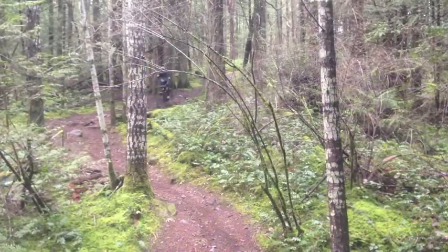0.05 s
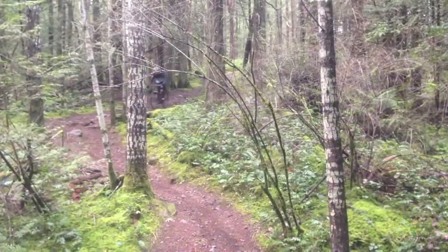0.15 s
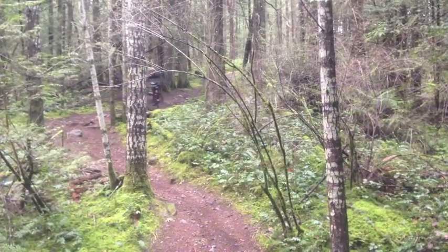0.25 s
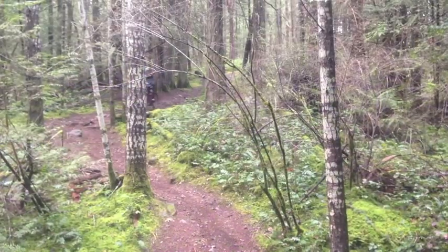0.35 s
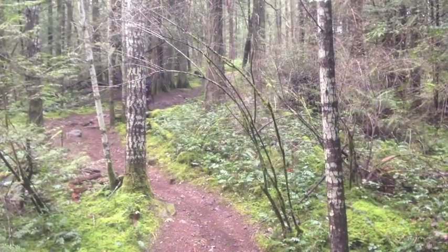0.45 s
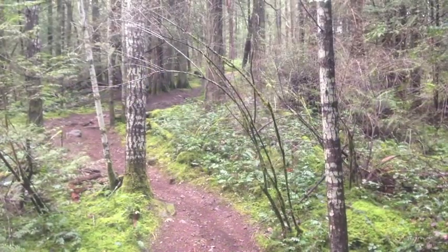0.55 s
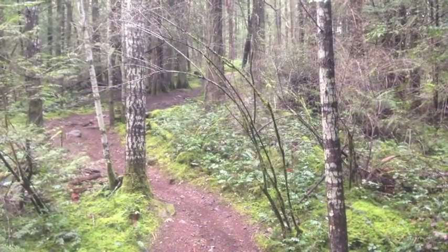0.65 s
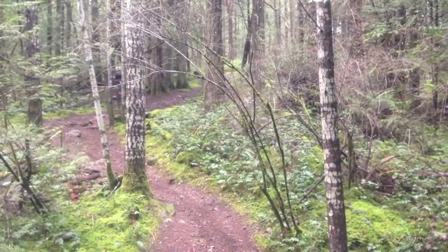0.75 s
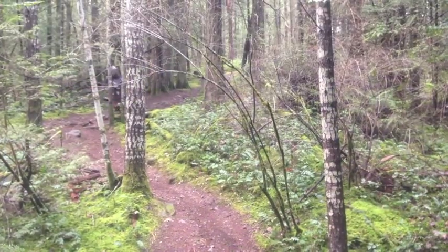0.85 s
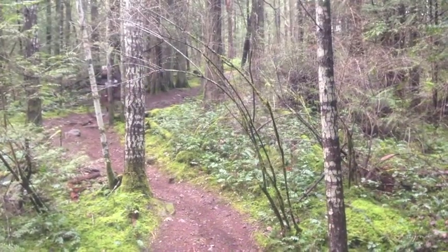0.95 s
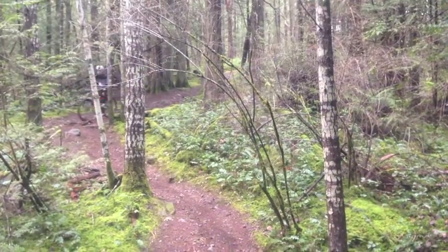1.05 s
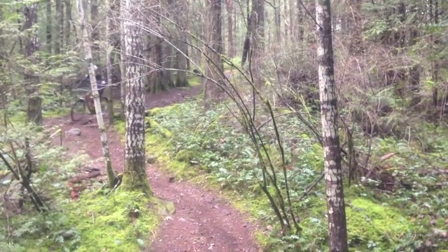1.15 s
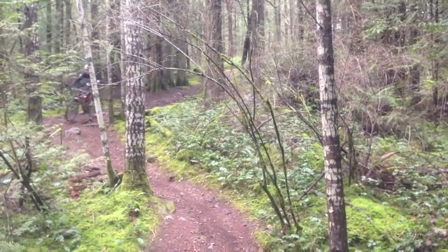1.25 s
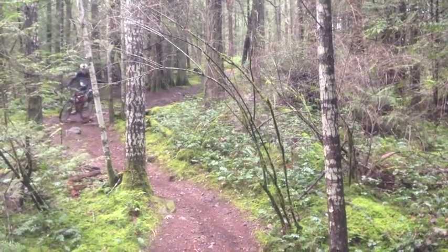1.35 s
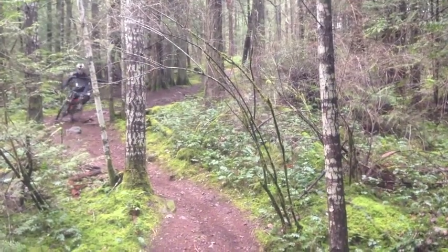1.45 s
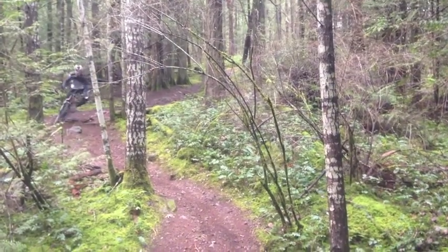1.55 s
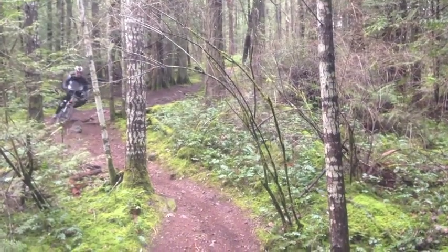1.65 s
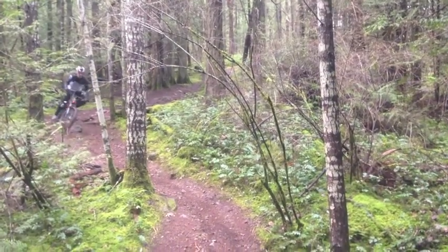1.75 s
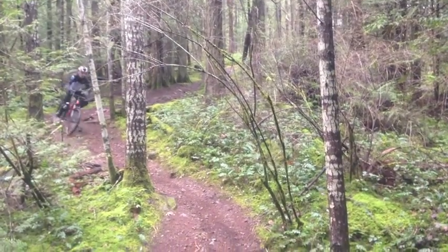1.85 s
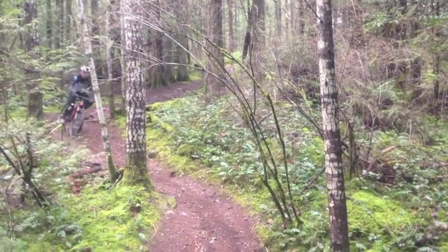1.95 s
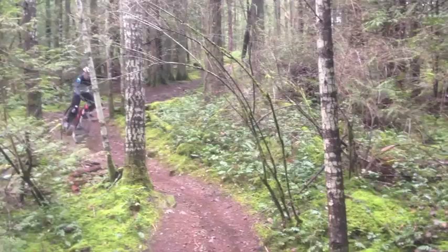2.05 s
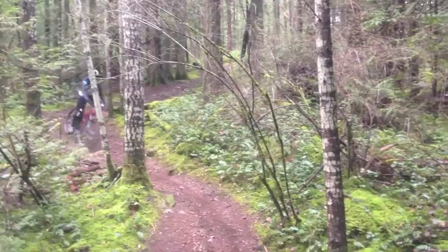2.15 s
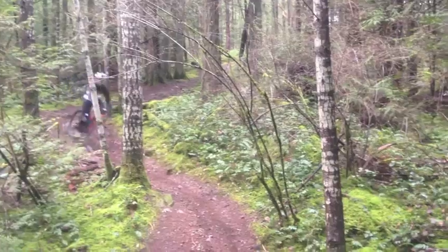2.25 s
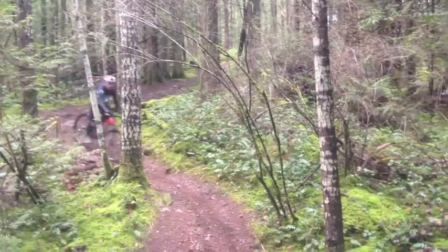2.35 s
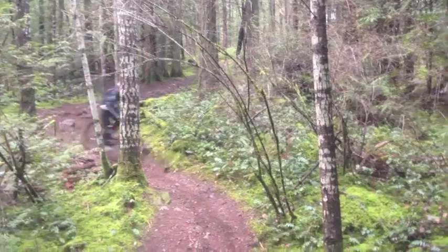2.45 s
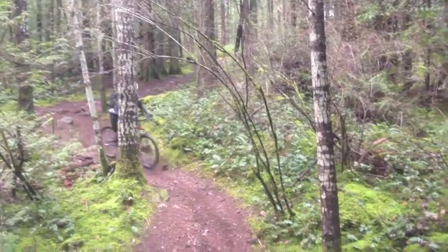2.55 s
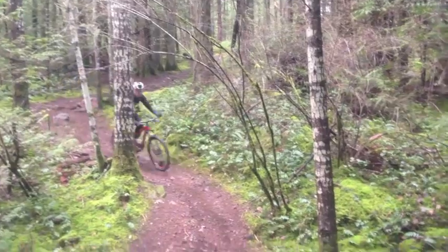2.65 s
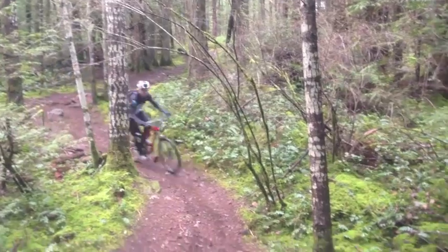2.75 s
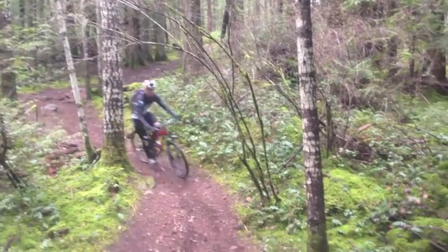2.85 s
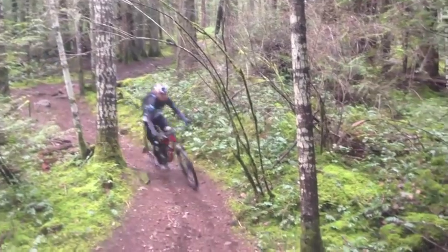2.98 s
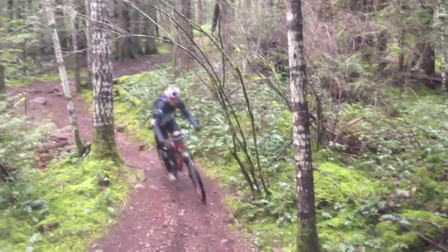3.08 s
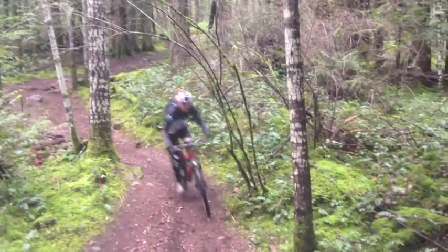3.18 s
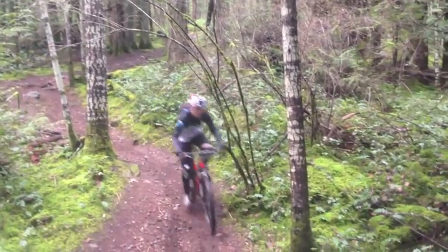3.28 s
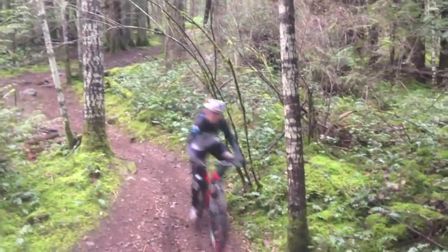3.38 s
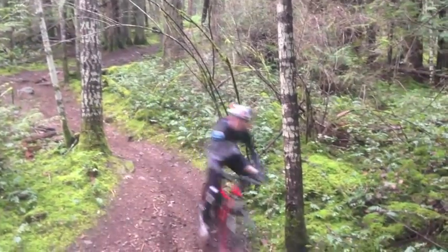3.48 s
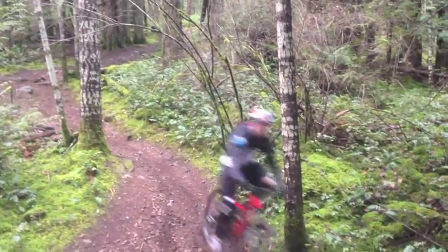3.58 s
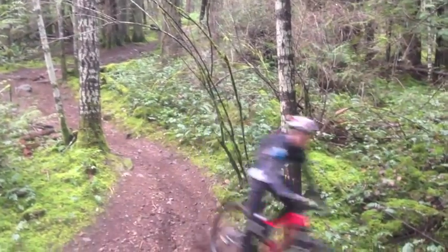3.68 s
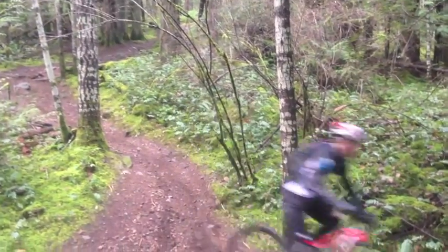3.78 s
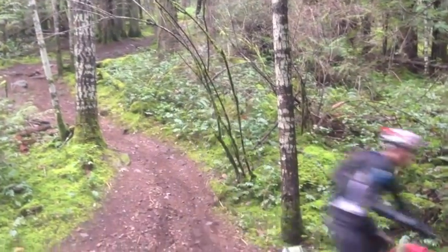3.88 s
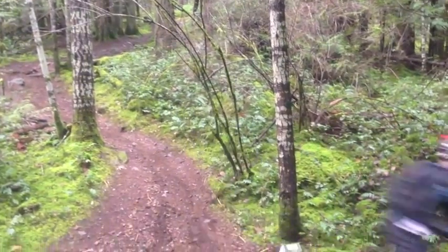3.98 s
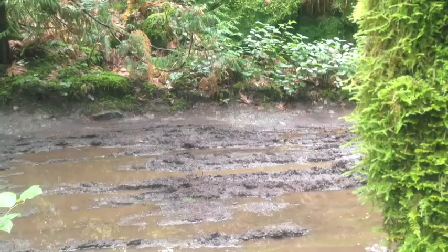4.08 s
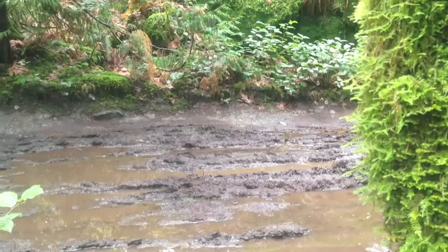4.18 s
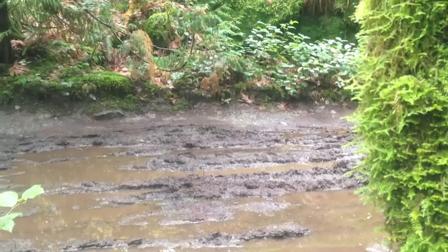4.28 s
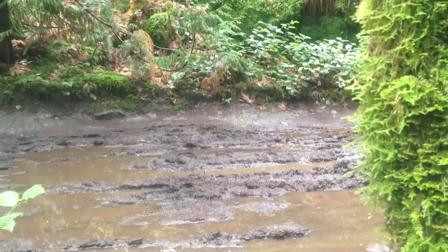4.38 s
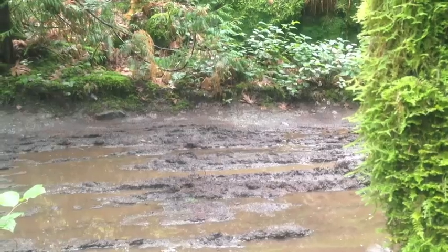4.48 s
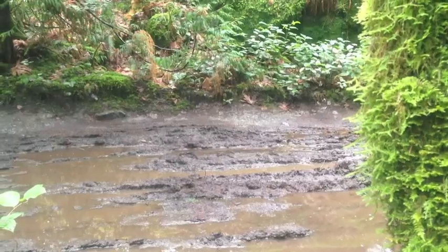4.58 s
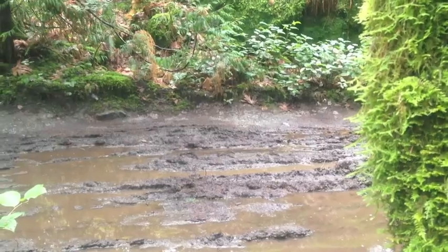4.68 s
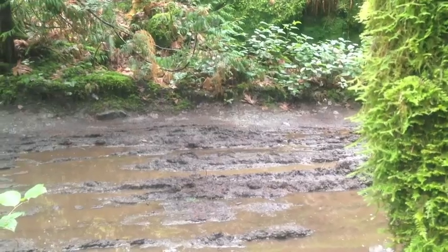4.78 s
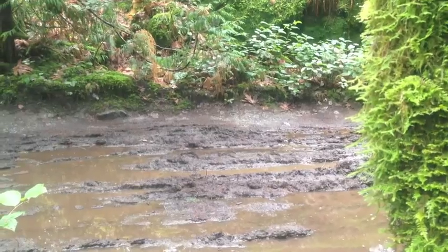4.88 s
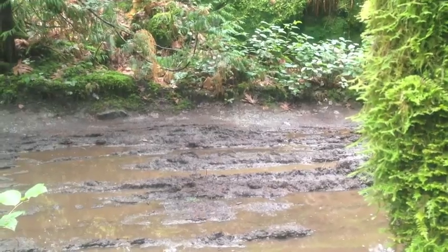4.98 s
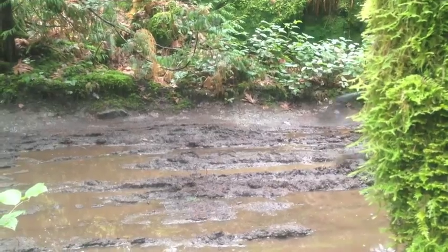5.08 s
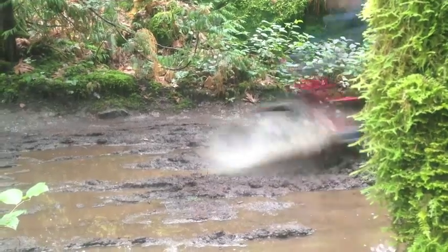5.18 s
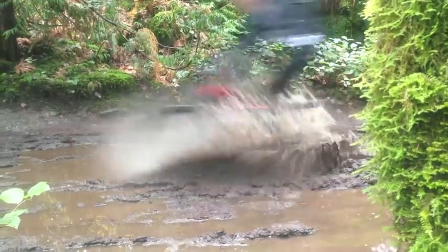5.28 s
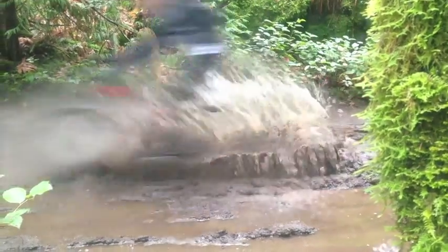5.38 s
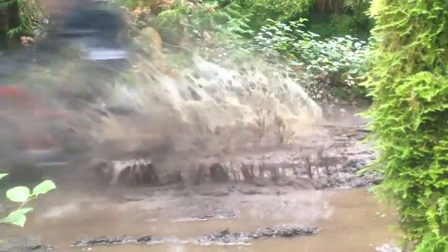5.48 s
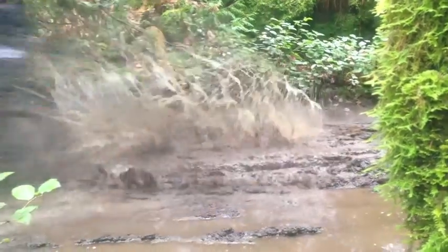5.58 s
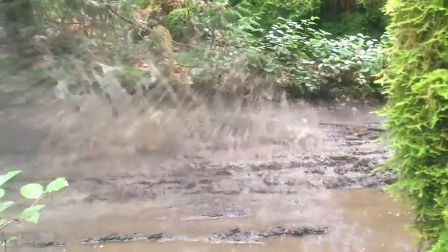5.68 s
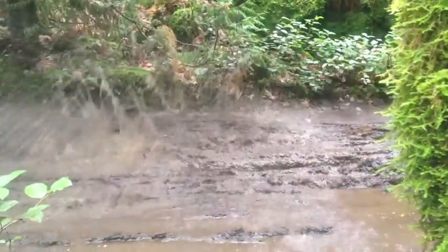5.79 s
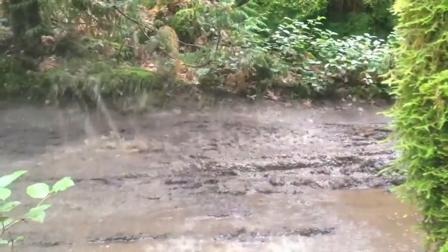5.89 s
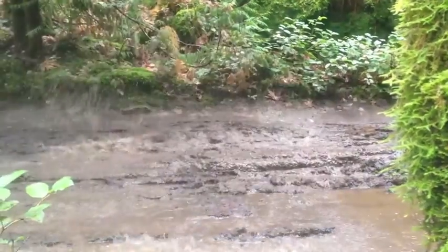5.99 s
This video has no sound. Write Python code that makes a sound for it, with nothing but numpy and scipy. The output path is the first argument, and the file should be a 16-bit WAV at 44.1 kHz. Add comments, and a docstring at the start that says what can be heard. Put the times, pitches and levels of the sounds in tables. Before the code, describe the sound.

A small outdoor microphone in still woodland picks up very faint air and a distant bicycle on damp grit. From 0 to 1.4 s there are only soft crunches, scuffs and isolated little clacks. Around 1.45-1.8 s stones snap and knock more clearly, then it thins out. A sharp cluster of rubbery scuffs and a knock comes at 2.4-2.55 s, followed by quiet irregular crunching and tiny ticks. From 3.65 s the tyres swell quickly into a close, coarse, crackling rush with hiss, clacks and low bumps, strongest about 3.8-4.08 s. At 4.14 s it cuts abruptly to a hollow, watery hiss with bright ticks and light spray, building unevenly. From 5.15 s wheels plough into muddy water: thick slosh, bright spray and low thuds peak around 5.3-5.6 s. After 5.65 s the splash subsides into hissing, pattering spray, still audible near 6 s.

```python
"""Tyres crunch over grit on a damp forest trail, with scuffs, snaps and clacks, as a bicycle passes close by.
After a cut it nears a muddy puddle and ploughs through: spray, slosh and mist, hollowed by the water's echo.
Crunch, hiss and wash are clumped ringing grains; scuffs, snaps and ticks are noise puffs; clacks are damped sines.
Bumps drive tyre boom and ground thud; frame ringing, tree echoes and still air complete the scene."""
import sys
import numpy as np
from scipy import signal
from scipy.fft import next_fast_len
from scipy.io import wavfile
from scipy.ndimage import uniform_filter1d

SR = 44100
rng = np.random.default_rng(int(sys.argv[2]) if len(sys.argv) > 2 else 0)


def dump(signal):
    """Clip the signal to [-1, 1] and save it as 16-bit WAV at the path in sys.argv[1]."""
    limited = np.clip(np.atleast_2d(signal).T, -1, 1)
    pcm = np.round(limited * 32767).astype(np.int16)
    wavfile.write(sys.argv[1], SR, pcm)


N = 266011

# tyres on the trail: t/s, soil crunch level/dB, grit level/dB, hiss level/dB
TRAIL_LEVELS = [(0, -60.5, -56, -63), (.2, -66.5, -67, -72.5), (.34, -56.5, -55, -67.5),
                (.46, -68.5, -67, -69.5), (.76, -68, -63, -71.5), (.96, -68, -71, -72),
                (1.18, -62.5, -64.5, -72.5), (1.4, -64, -62.5, -69.5), (1.5, -45.5, -50, -68.5),
                (1.62, -51.5, -61, -64), (1.71, -48, -46, -64), (1.78, -50, -47, -65),
                (1.81, -59, -51.5, -65), (1.87, -55.5, -54, -68), (1.93, -56, -52.5, -65),
                (2.03, -65.5, -60, -66), (2.12, -65.5, -66, -67.5), (2.23, -60.5, -62.5, -72),
                (2.3, -60, -62, -68.5), (2.49, -58.5, -53.5, -67), (2.6, -54.5, -52.5, -65.5),
                (2.7, -62.5, -58, -68.5), (2.83, -57.5, -57, -71.5), (2.93, -59, -62.5, -69),
                (2.99, -53, -55.5, -69), (3.07, -54.5, -60, -71), (3.15, -58.5, -62, -69),
                (3.23, -50.5, -61, -65), (3.3, -53, -61, -69), (3.37, -53, -57, -69), (3.5, -55, -54, -65),
                (3.62, -51.5, -55, -67), (3.665, -45.5, -43, -65), (3.685, -44, -43, -52),
                (3.73, -45, -33, -50.5), (3.765, -40, -38, -47), (3.778, -39, -36.5, -48),
                (3.81, -39.5, -29.5, -41.5), (3.83, -33, -30, -45), (3.841, -41, -36, -42),
                (3.85, -39, -28, -44), (3.862, -40, -36, -48), (3.885, -37, -28, -42),
                (3.903, -45, -37.5, -48), (3.918, -38, -30.5, -41), (3.948, -37, -39, -38.5),
                (3.97, -33.5, -29, -42), (3.995, -31, -27.5, -39.5), (4.021, -34, -29, -38),
                (4.04, -32, -28, -47), (4.064, -42, -36, -44), (4.078, -35, -36, -49),
                (4.09, -45, -41.5, -47.5), (4.13, -58.5, -45, -65)]
# wheel going by: t/s, tyre hiss f/Hz, ground-echo hollow f/Hz, hollow depth/1 (held to 0.6 in use)
HISS_PATH = [(0, 7300, 5960, 0), (3.6, 10500, 6450, 0.16), (3.8, 11200, 5740, 1), (3.95, 9600, 5400, 1),
             (4.05, 8350, 4500, 0.7), (4.14, 8200, 4620, 0.9)]
# tyres in mud and water: t/s, spray level/dB, slosh level/dB, mist level/dB
PUDDLE_LEVELS = [(4.155, -54, -64, -60), (4.18, -49, -42.5, -51), (4.24, -48, -46, -53.5),
                 (4.29, -45, -43.5, -47.5), (4.5, -35, -45, -47), (4.56, -39, -42, -45.5),
                 (4.7, -36.5, -45.5, -44), (4.755, -33.5, -39.5, -37), (4.78, -38.5, -44, -57),
                 (4.805, -39, -49, -55), (4.82, -41, -44, -41), (4.866, -37.5, -45, -38.5),
                 (4.96, -46.5, -44.5, -44), (5.02, -37.5, -42.5, -38), (5.07, -36, -35, -44.5),
                 (5.09, -38, -37.5, -38), (5.12, -35, -35.5, -46), (5.145, -45, -43.5, -47),
                 (5.165, -39.5, -34.5, -39), (5.19, -29, -32, -43), (5.21, -30, -38, -31.5),
                 (5.255, -29, -35, -35.5), (5.285, -35.5, -38, -35), (5.31, -30, -33, -30.5),
                 (5.355, -28, -31, -28.5), (5.375, -27, -29, -39), (5.415, -29, -32.5, -28.5),
                 (5.48, -26, -24, -28.5), (5.515, -25, -30, -34), (5.555, -25.5, -27.5, -40),
                 (5.59, -25.5, -31, -34), (5.67, -32, -34.5, -37), (5.93, -34.5, -37.5, -41.5),
                 (5.96, -31.5, -39, -35), (6.03, -34.5, -37.5, -38)]
# colour over the water: t/s, echo hollow f/Hz, hollow depth/1, spray peak f/Hz, peak strength/1
WATER_MIRROR = [(4.14, 2100, 0.7, 3220, 0.76), (4.7, 1820, 0.58, 2850, 0.16), (4.95, 1920, 0.3, 4020, 2),
                (5.06, 2620, 0.28, 3760, 0.45), (5.165, 2770, 0.4, 4100, 1.5), (5.2, 2940, 0.55, 4340, 1.7),
                (5.28, 2880, 0.25, 4370, 2.3), (5.35, 3360, 0.18, 4730, 0.99), (5.45, 3860, 0, 5740, 1.03),
                (5.55, 4500, 0.46, 6900, 0.52), (5.7, 3420, 0, 5670, 0.23)]
# moving slosh pitch as the wheels enter the water: t/s, f/Hz, strength/1
SLOSH_SWOOP = [(4.14, 1300, 0.89), (4.97, 1210, 0.77), (5.03, 1270, 1.6), (5.065, 1740, 1.3),
               (5.125, 740, 1.2), (5.15, 800, 1), (5.158, 1860, 1.4), (5.2, 1330, 2), (5.27, 880, 1.5),
               (5.3, 1620, .5), (5.37, 1790, 0.68), (5.46, 1750, 0.71), (5.5, 2390, 1.1), (5.55, 2370, 1.5),
               (5.62, 2680, 0.91), (5.7, 2150, 0.75)]
# scuffs swelling over roots: start t/s, nominal peak/dB, f/Hz, bite re body/dB, treble re body/dB, length/s
SCUFFS = [(0.234, -34.5, 960, -8, -14, 0.023), (0.256, -55.5, 1140, 6, -4, 0.064),
          (0.439, -47, 950, -21, -17, 0.0093), (0.59, -46.5, 980, -1, -23, 0.037),
          (0.937, -51, 1240, -9, -22, 0.025), (1.049, -46, 1080, -7, -23, 0.015),
          (1.53, -37.5, 794, -4, -12, 0.046), (1.584, -40, 950, -19, -10, 0.045),
          (1.615, -33, 880, -1.5, -8.5, 0.022), (1.658, -40, 1260, -2, -7, 0.019),
          (1.728, -33, 1360, -11, -17, 0.023), (1.768, -36.5, 790, -7, -16, 0.02),
          (2.277, -40.5, 1210, 0.5, -14, 0.034), (2.301, -38.5, 1270, 2.5, -14.5, 0.04),
          (2.347, -38.5, 1370, 0.5, -12, 0.016), (2.419, -26, 1170, 1, -12.5, 0.027),
          (2.485, -30.5, 960, -3, -13, 0.03), (2.504, -32, 1090, 3, -9, 0.03),
          (2.514, -26.5, 1050, 2.5, -12, 0.031), (2.531, -18, 1150, -3, -14.5, 0.016),
          (2.653, -42, 864, -12, -12, 0.016), (2.793, -50, 1010, -5, -22, 0.043),
          (2.954, -60, 982, 5, -13, 0.089), (3.019, -53, 1080, 10, -25, 0.032),
          (3.08, -57, 985, 9, -21, 0.02), (3.17, -35, 1150, -6, -20, 0.014),
          (3.387, -43.5, 650, -8, -24, 0.04), (3.441, -41, 830, -13, -20, 0.021),
          (3.558, -48, 1170, -11, -22, 0.038), (3.668, -25, 1290, 0, -24, 0.043),
          (3.728, -31, 1200, 0, -20, 0.053), (3.796, -30, 1220, 0.5, -26, 0.019),
          (3.83, -23, 1270, -18, -24, 0.01), (3.864, -21.5, 1310, -5, -23, 0.013),
          (3.879, -21, 1520, -1, -13, 0.017), (3.908, -25.5, 1490, -13, -18, 0.038),
          (3.976, -23, 680, 5.5, -26, 0.032), (3.997, -17.5, 1810, -17, -14, 0.01),
          (4.009, -20.5, 1120, -3, -21, 0.016), (4.024, -20.5, 1800, 0, -16, 0.016),
          (4.068, -28.5, 1000, 4.5, -8, 0.017), (4.545, -22.5, 3100, -24, -10, 0.018)]
# stones and twigs snapping under the tread: start t/s, nominal peak/dB, f/Hz, bite re body/dB,
# treble re body/dB, length/s
SNAPS = [(0.537, -38.5, 1200, -20, -29, 0.02), (1.146, -41.5, 1050, -22, -26, 0.009),
         (1.3, -41.5, 770, -1, -27, 0.012), (1.438, -41, 795, -2, -8, 0.006),
         (1.526, -34, 850, -4, -12, 0.011), (1.56, -32, 1110, -20, -15, 0.016),
         (1.688, -35, 1700, -6, -18, 0.0042), (1.694, -32, 1330, -12, -28, 0.0095),
         (1.723, -28.5, 1030, -13, -33, 0.0066), (1.745, -27.5, 860, -2, -27, 0.008),
         (1.853, -37, 774, 0, -15, 0.015), (2.434, -25, 1300, -27, -48, 0.013),
         (2.46, -26, 1130, -22, -20, 0.0034), (2.722, -38, 635, -19, -21, 0.0067),
         (3.336, -42.5, 600, -1, -21, 0.008), (3.505, -59, 600, 8, 7, 0.0097),
         (3.75, -29, 1250, -12, -26, 0.01), (3.844, -15, 1380, -32, -25, 0.0074),
         (4.036, -17, 1490, -13, -17, 0.016), (4.175, -37, 794, 9, -12, 0.014),
         (4.219, -25, 1000, 0.5, -14, 0.0034), (5.004, -28, 1170, -11, -3, 0.0057),
         (5.297, -18.5, 4500, -12, -21, 0.0076), (5.49, -36, 1510, -11, -20, 0.0079),
         (5.615, -23, 1450, -3, -20, .01), (5.645, -26, 1210, -10, -20, 0.012),
         (5.676, -20, 900, -12, -20, 0.0088), (5.958, -23, 1240, -22, -12, 0.011)]
# flung grit and drops: start t/s, nominal peak/dB, f/Hz, bite re body/dB, treble re body/dB
TICKS = [(0.3634, -54, 2790, 5, -6), (1.5755, -34, 4020, -27, -25), (1.6046, -39, 4180, -21, -24),
         (1.972, -47, 2430, 3, -15), (2.0976, -56, 2660, 8, -8), (3.03, -63, 2660, -5, -1),
         (3.147, -59, 2660, -2, 3), (3.164, -62, 2660, -5, 5), (3.205, -57, 2700, -2, 1),
         (3.2374, -46, 2660, -9, -6), (3.266, -55, 2660, -5, 0), (3.29, -59, 2660, -5, 2),
         (3.322, -61, 2660, 0, -2), (3.3834, -45, 2470, -20, -19), (3.4273, -49.5, 2990, 6.5, 10.5),
         (3.463, -57, 2660, 2, 1), (3.536, -41.5, 2550, -18, -9), (3.5824, -41, 2520, -19, -11),
         (3.7444, -32, 2400, -19, -19), (4.1733, -40, 2560, -18, -21), (4.2014, -34.5, 3520, -18, -24),
         (4.25, -21.5, 2600, -6.5, -19), (4.311, -25, 2880, -7, -16), (4.3236, -23.5, 3150, -26, -23),
         (4.4082, -22.5, 4850, -12, -23), (4.428, -29, 3900, -16, -19), (4.478, -31, 2940, -15, -19),
         (4.5294, -24.5, 4100, -9, -6), (4.611, -23.5, 4340, -15, -21), (4.7366, -30, 3400, -18, -5),
         (4.852, -25, 3140, 0.5, -5), (4.9706, -26, 4330, -6, -11), (5.0679, -21, 2680, -20, -23),
         (5.1923, -16.5, 4150, -5, -22), (5.234, -24, 4710, -30, -19), (5.2535, -22, 3900, -18, -20),
         (5.3695, -17.5, 1990, -12, -23), (5.431, -35, 5490, -10, -16), (5.4784, -17, 2340, -12, -13),
         (5.5464, -18.5, 2330, -26, -20), (5.9606, -34, 5250, -17, -15)]
# stones knocking rim and tread: t/s, peak before the high-pass/dB, f/Hz
CLACKS = [(0.2447, -32, 1870), (0.2488, -32.5, 1850), (0.5437, -41, 1670), (0.601, -45, 2200),
          (0.7444, -47, 1500), (0.7726, -47.5, 1490), (0.865, -52, 1270), (1.0063, -44, 1330),
          (1.169, -44, 1090), (1.3039, -38.5, 1700), (1.4384, -41, 2600), (1.4532, -26.5, 2580),
          (1.4981, -25, 2600), (1.7222, -31, 1490), (1.7475, -41, 2260), (1.7505, -31.5, 1660),
          (1.8246, -37, 1860), (1.957, -50, 2430), (2.02, -46, 2970), (2.1488, -50, 1260),
          (2.175, -42.5, 2000), (2.4303, -23.5, 1340), (2.7207, -46, 1300), (2.7631, -46, 2260),
          (2.7803, -42, 2060), (2.805, -42.5, 1710), (2.8313, -42, 2280), (3.0305, -40, 2580),
          (3.0348, -35.5, 1800), (3.0934, -45, 1610), (3.2256, -47, 1190), (3.2544, -51, 1840),
          (3.3348, -48, 2500), (3.3683, -45, 2480), (3.407, -43, 1930), (3.436, -40, 1390),
          (3.5075, -37, 2640), (3.6785, -31, 2700), (3.767, -25.5, 1610), (3.8475, -23.5, 1430),
          (3.9695, -22, 1800), (4.0005, -22, 2690), (4.0095, -23, 1770), (4.0434, -18, 1810),
          (4.2025, -31, 3500), (4.3697, -22.5, 4060), (4.41, -23.5, 5070), (4.45, -29, 2920),
          (4.5905, -29, 4070), (4.6175, -23, 4640), (4.7365, -26, 3430), (5.3015, -11, 4700),
          (5.386, -23, 1760)]
# bumps loading the tyre: t at full strength/s, hold/s, tyre boom level/dB, ground thud level/dB
BUMPS = [(0.08, 0.034, -82, -78), (0.255, 0.0082, -54, -63), (0.553, 0.0084, -58.5, -70),
         (0.756, .01, -63, -73), (0.922, 0.011, -63, -75), (1.031, 0.028, -60, -64),
         (1.288, 0.011, -63, -75), (1.45, .01, -67, -73), (1.576, .01, -59, -74), (1.715, 0.17, -70, -71),
         (2.514, .01, -53, -55), (2.684, 0.014, -66, -68), (2.844, .01, -57, -67), (3.016, 0.027, -54, -84),
         (3.22, 0.037, -63, -69), (3.39, 0.075, -63, -65), (3.628, 0.01, -52, -54),
         (3.73, 0.014, -60, -42.5), (3.757, 0.026, -48, -59), (3.822, 0.0066, -44, -41),
         (3.887, 0.0064, -40, -45), (3.965, 0.019, -38, -37), (4.021, 0.012, -38, -42),
         (4.044, 0.017, -38, -52), (4.08, 0.0091, -48, -60), (4.174, 0.037, -58, -83),
         (4.25, 0.11, -56, -85), (4.396, 0.16, -56.5, -83), (4.574, 0.0065, -42, -77),
         (4.675, 0.084, -50.5, -91), (4.812, 0.18, -57, -85), (4.924, 0.065, -65, -58),
         (5.063, .03, -55, -62), (5.13, 0.01, -53, -47.5), (5.305, 0.038, -40.5, -35.5),
         (5.379, 0.057, -43.5, -32), (5.472, 0.027, -39, -30.5), (5.628, 0.01, -70, -40.5),
         (5.684, 0.009, -47, -47), (5.948, 0.0081, -66, -53)]
# wheel and frame modes: f/Hz, bandwidth/Hz, gain/dB
FRAME_MODES = [(561, 27, -9), (1007, 31, -5.5), (1225, 8.7, -18), (1820, 15, -6.5), (2410, 27, 1),
               (2860, 15, -40)]

# spectra of soil, grit, damp leaves and tread hiss: f/Hz, relative density/dB per Hz
SOIL_COLOUR = [(250, -46.5), (430, -3), (560, 3.5), (1000, 1.5), (1400, -3.5), (1900, -4), (3500, -46)]
GRIT_COLOUR = [(700, -31.5), (1200, 3), (1500, -6.5), (1800, 3.5), (2100, 1.5), (2400, 0), (2900, 0.5),
               (3300, -14), (5200, -25), (9000, -56)]
CRACKLE_COLOUR = [(2000, -30), (3500, 1), (5000, -8), (7000, -14), (10000, -30), (15000, -15)]
FIZZ_COLOUR = [(3500, -14), (5500, 0), (7000, -5.5), (10000, -6), (13000, -3.5), (16000, -4)]
# spectra of flung water, fine mist and muddy slosh: f/Hz, relative density/dB per Hz
SPRAY_COLOUR = [(1200, -31), (2000, 3), (3000, -1), (5000, -1.5), (7000, -8.5), (9000, -5.5), (13000, -11)]
MIST_COLOUR = [(3820, -19), (6500, 2), (7560, -5), (14600, -2.5), (15000, -13), (15700, -3)]
SLOSH_COLOUR = [(210, -63), (350, -5.5), (408, -3.5), (525, 4), (1310, 4), (1850, 6), (2090, -3), (3000, 6),
                (3900, -76), (6600, -120)]
# spectra of tyre air chamber, ground and forest air: f/Hz, relative density/dB per Hz
BOOM_COLOUR = [(70, -52), (170, -27.5), (235, -18), (262, -3), (280, 0.5), (310, -8), (400, -16),
               (600, -44)]
THUD_COLOUR = [(60, -80), (120, -29), (150, -5), (190, -3.5), (250, 5), (330, -25), (450, -32.5)]
AIR_COLOUR = [(24, -30), (45, -17), (100, -8), (150, -2), (280, 0), (430, -10), (600, -7), (1200, -6),
              (2700, -13), (5000, -21), (8700, -25), (14300, -24), (15700, -26)]

CUT_S, FADE_OUT_S, FADE_IN_DELAY_S, FADE_IN_S = 4.14, .008, .006, .012
CLUMP_DB = 1.7
CRACKLE_DB, CRACKLE_GRIT_SHARE = -2.5, 0.54  # leaves follow grit by this share, hiss by the rest
FAR_SHARE, CLOSER_SHARE, NEAR_SHARE = 0.11, 0.42, 0.79  # share of the mist heard close
ARRIVE_S, ARRIVE_LENGTH_S = 5.03, 0.054
SCUFF_RISE_SHARE, SNAP_RISE_SHARE = 0.56, 0.3  # of the event length
TICK_RISE_S, TICK_FALL_S = 0.0003, 0.0062
CLACK_RING_S, CLACK_REBOUND_S, CLACK_REBOUND_DB = 0.00095, 0.0022, -10
CLACK_UNDER_RATIO, CLACK_UNDER_DB = 0.517, -5.5  # duller knock below each clack
BUMP_RISE_DB_PER_S, BUMP_FALL_DB_PER_S = 1300, 850
ROLL_BOOM_DB, ROLL_THUD_DB = -12, -22.5  # re soil crunch
MUD_BOOM_DB, MUD_THUD_DB = -19.5, -19  # re slosh
TREES_DB, TREES_T60_S = -20.0, 0.041
AIR_DB = -65
EDGE_HZ = 15500


def trail(hits):
    """Soil and grit crunch, damp leaves crackle, the tread hisses; a ground echo hollows the pass."""
    soil_db, grit_db, fizz_db = follow(TRAIL_LEVELS)
    crackle_db = CRACKLE_DB + CRACKLE_GRIT_SHARE * grit_db + (1 - CRACKLE_GRIT_SHARE) * fizz_db
    hiss_hz, hollow_hz, depth = follow(HISS_PATH)
    soil = gain_of(soil_db) * grains(SOIL_COLOUR, 600, 1.0, CLUMP_DB, 0.028, 0.9, 9.0, count=14)
    grit = gain_of(grit_db) * grains(GRIT_COLOUR, 1300, 1.5, CLUMP_DB, 0.02, 0.9, 9.0, count=12)
    crackle = gain_of(crackle_db) * grains(CRACKLE_COLOUR, 1500, 1.0, 1.0, 0.046, 0.48, 0.58, count=4)
    fizz = grains(FIZZ_COLOUR, 3000, 1.1, 1.4, 0.0034, 1.0, 2.0, count=4)
    fizz = gain_of(fizz_db) * evened(fizz + resonate(fizz, hiss_hz, 3900))
    jolts = soil + grit + hits
    direct = jolts + frame(jolts) + crackle + fizz
    return direct - np.clip(depth, 0, .6) * resonate(direct, hollow_hz, 1870)


def puddle(hits):
    """Spray, mist and slosh; the echo off flat water, half a period late in one band, is subtracted there."""
    spray_db, slosh_db, mist_db = follow(PUDDLE_LEVELS)
    hollow_hz, depth, spray_hz, spray_strength = follow(WATER_MIRROR)
    swoop_hz, swoop_strength = follow(SLOSH_SWOOP)

    spray = grains(SPRAY_COLOUR, 2000, 0.85, 0.73, 0.021, 1.0, 7.0, count=14)
    # a moving peak brightens the spray
    peak = resonate(resonate(spray, spray_hz, 2500), spray_hz, 2500)
    spray = gain_of(spray_db) * evened(spray + spray_strength * peak)

    near_mist = grains(MIST_COLOUR, 4200, 1.5, CLUMP_DB, 0.011, 2.0, 2.4, count=4)
    # leaves and damp air soak up the top
    far_mist = evened(signal.lfilter(*signal.butter(2, 10000, fs=SR), near_mist))
    near_times_s = [CUT_S, ARRIVE_S, ARRIVE_S + ARRIVE_LENGTH_S]
    near = np.interp(np.arange(N) / SR, near_times_s, [FAR_SHARE, CLOSER_SHARE, NEAR_SHARE])
    mist = gain_of(mist_db) * (near * near_mist + (1 - near) * far_mist)

    slosh = grains(SLOSH_COLOUR, 1800, 1.3, 1.4, 0.0095, 1.0, 6.0, count=14)
    swoop = resonate(resonate(slosh, swoop_hz, 750), swoop_hz, 750)
    slosh = gain_of(slosh_db) * evened(slosh + swoop_strength * swoop)

    direct = spray + mist + slosh + hits
    for detune in (.9, 1.1):  # two neighbouring passes make one broad hollow
        direct = direct - np.clip(depth, 0, 1) * resonate(direct, detune * hollow_hz, 1130)
    return direct


def scuffs():
    """Tread rubber drags over roots: rough puffs that swell slowly."""
    length_s = np.array(SCUFFS)[:, -1]
    return bursts(SCUFFS, SCUFF_RISE_SHARE * length_s, (1 - SCUFF_RISE_SHARE) * length_s, 1.34,
                  bite_hz=[1700, 3100], treble_hz=[4300, 7400], rough_db=5.0)


def snaps():
    """Stones and twigs give way under the tread: puffs that rise quickly."""
    length_s = np.array(SNAPS)[:, -1]
    return bursts(SNAPS, SNAP_RISE_SHARE * length_s, (1 - SNAP_RISE_SHARE) * length_s, 1.49,
                  bite_hz=[1700, 3200], treble_hz=[4300, 7800], rough_db=0.0)


def ticks():
    """Flung grit and drops strike: bright puffs with a near-instant rise."""
    return bursts(TICKS, TICK_RISE_S, TICK_FALL_S, 1.41,
                  bite_hz=[5500, 9000], treble_hz=[9000, 15000], rough_db=3.0)


def clacks():
    """Stones knock rim and tread: a few cycles that die at once, then a weaker inverted rebound."""
    out, t = np.zeros(N), np.arange(800) / SR
    for start_s, peak_db, hz in CLACKS:
        ring = np.sin(2 * np.pi * hz * t)
        ring += gain_of(CLACK_UNDER_DB) * np.sin(2 * np.pi * CLACK_UNDER_RATIO * hz * t)
        ring *= np.exp(-t / CLACK_RING_S) * (1 - np.exp(-t * hz))
        for late_s, gain in ((0, 1), (CLACK_REBOUND_S, -gain_of(CLACK_REBOUND_DB))):
            at = round((start_s + late_s) * SR)
            out[at:at + len(t)] += gain * gain_of(peak_db) * ring / ring.max()
    return signal.lfilter(*signal.butter(2, 500, "high", fs=SR), out)


def lows():
    """Rolling and bumps on the tread sound the tyre's air chamber and thud into the ground: narrow rumbles."""
    t = np.arange(N) / SR
    crunch_db, slosh_db = follow(TRAIL_LEVELS)[0], follow(PUDDLE_LEVELS)[1]
    boom_gain = gain_of(np.where(t < CUT_S, crunch_db + ROLL_BOOM_DB, slosh_db + MUD_BOOM_DB))
    thud_gain = gain_of(np.where(t < CUT_S, crunch_db + ROLL_THUD_DB, slosh_db + MUD_THUD_DB))
    for full_s, hold_s, boom_db, thud_db in BUMPS:
        part = slice(max(round((full_s - .2) * SR), 0), round((full_s + .5) * SR))
        u = t[part] - full_s
        rise_db = BUMP_RISE_DB_PER_S * np.minimum(u, 0)
        fall_db = BUMP_FALL_DB_PER_S * np.maximum(u - hold_s, 0)
        load = gain_of(rise_db - fall_db)
        boom_gain[part] += gain_of(boom_db) * load
        thud_gain[part] += gain_of(thud_db) * load
    boom = grains(BOOM_COLOUR, 220, 1.8, 0.4, 0.01, 1.2, 0.6, count=1)
    thud = grains(THUD_COLOUR, 300, 1.5, .8, .02, 1.5, .6, count=1)
    both = boom_gain * steadied(boom, .6) + thud_gain * steadied(thud, .6)
    # the rumbles hold no deep bass
    return signal.sosfilt(signal.butter(3, 125, "high", fs=SR, output="sos"), both)


def frame(x):
    """Jolts excite the wheel and frame modes, each a narrow resonance."""
    return sum(gain_of(db) * signal.lfilter(*signal.iirpeak(hz, hz / width_hz, SR), x)
               for hz, width_hz, db in FRAME_MODES)


def trees(x):
    """Scattered echoes off the trunks: sparse taps of random sign, smoothed, that die away."""
    taps = np.zeros(SR // 2)
    at = np.arange(400, len(taps) - 20, 20)
    taps[at + rng.integers(0, 20, len(at))] = rng.choice([-1., 1.], len(at))
    decay_db = -60 * np.arange(len(taps)) / SR / TREES_T60_S
    taps = signal.lfilter([1], [1, -.6], taps) * gain_of(decay_db)
    return signal.oaconvolve(x, taps / np.linalg.norm(taps))[:N]


def air():
    """Still forest air: faint steady coloured noise."""
    return gain_of(AIR_DB) * colour(rng.standard_normal(N), AIR_COLOUR)


def grains(points, per_s, spread_db, clump_db, clump_s, wash, cycles, count=8):
    """Uneven grains ring with Q = cycles; they clump over a wash too fine to tell apart."""
    step, out = 32, np.zeros(N)
    smooth = np.exp(-step / (clump_s * SR))
    drift = rng.standard_normal((count + 1, N // step + 1))
    clumps = evened(signal.lfilter([1], [1, -2 * smooth, smooth ** 2], drift))
    swell = gain_of(clump_db * (clumps[0] + 0.33 * clumps[1:]))  # partly shared by all rows
    size = gain_of(spread_db * np.minimum(rng.exponential(1, N), 5))
    size = size * (rng.random(N) < per_s / SR) * rng.choice([-1., 1.], N)
    pitch = rng.integers(0, count, N)
    # the first swell row shapes the wash, the rest the pitches in turn; the top or lone pitch stays silent
    for k, (hz, own) in enumerate(zip(np.geomspace(points[1][0], points[-2][0], count), swell[1:])):
        clicks = evened(size * (pitch == k)) * np.repeat(own, step)[:N]
        out += signal.lfilter(*signal.iirpeak(hz, cycles, SR), clicks)
    fine = rng.standard_normal(N) * np.repeat(swell[0], step)[:N]
    return colour(evened(out) + wash * evened(fine), points)


def bursts(table, rise_s, fall_s, width, bite_hz, treble_hz, rough_db):
    """Crumbly noise: pitched body, bite and treble hiss, all sharing one swell and decay."""
    out, t = np.zeros(N + SR), np.arange(6000) / SR
    bite = signal.butter(3, bite_hz, "band", fs=SR, output="sos")
    treble = signal.butter(2, treble_hz, "band", fs=SR, output="sos")
    rises_s, falls_s = np.broadcast_to(rise_s, len(table)), np.broadcast_to(fall_s, len(table))
    for event, rise, fall in zip(table, rises_s, falls_s):
        start_s, peak_db, hz, bite_db, treble_db = event[:5]
        crumbs = rng.standard_normal(len(t)) * gain_of(rough_db * rng.standard_normal(len(t)))
        body = signal.butter(2, [hz / width, hz * width], "band", fs=SR, output="sos")
        swell = np.sin(np.pi / 2 * t / rise) ** 2
        decay = np.exp(-(abs(t - rise) / fall) ** 0.76)
        shape = np.where(t < rise, swell, decay)
        at = round(start_s * SR)
        for band, rel_db in ((body, 0), (bite, bite_db), (treble, treble_db)):
            puff = shape * signal.sosfilt(band, crumbs)
            puff *= np.linalg.norm(shape) / np.linalg.norm(puff) / 2  # peaks reach about twice the rms
            out[at:at + len(t)] += gain_of(peak_db + rel_db) * puff
    return out[:N]


def resonate(x, hz, width_hz):
    """Resonance of gain 1 that follows the curve hz: shift to 0 Hz, low-pass, shift back."""
    turn, r = np.exp(2j * np.pi * np.cumsum(hz) / SR), np.exp(-np.pi * width_hz / SR)
    return 2 * (turn * signal.lfilter([1 - r], [1, -r], x / turn)).real


def colour(x, points):
    """Causal filter with the given spectrum: the phase is the Hilbert transform of the log gain."""
    hz = abs(np.fft.fftfreq(8192, 1 / SR))
    f, db = np.transpose(points)
    log_gain = np.log(gain_of(np.maximum(np.interp(np.log(hz + 1), np.log(f), db), -100)))
    taps = np.fft.ifft(np.exp(np.conj(signal.hilbert(log_gain)))).real[:4096]
    return evened(signal.oaconvolve(x, taps)[:N])


def steadied(x, share):
    """Evens out part of the chance beats of a narrow rumble."""
    envelope = abs(signal.hilbert(x, next_fast_len(N))[:N])
    return evened(x / (uniform_filter1d(envelope, size=200) + 0.18) ** share)


def follow(table):
    """Columns of a table, interpolated at every sample."""
    t, (s, *columns) = np.arange(N) / SR, np.transpose(table)
    return [np.interp(t, s, c) for c in columns]


def evened(x):
    """Scales to unit rms."""
    return x / np.sqrt(np.mean(x ** 2) + 1e-20)


def gain_of(db):
    """Amplitude ratio of a level in dB."""
    return 10 ** (np.asarray(db) / 20)


def scene():
    """Trail up to the cut, puddle after it; lows and air fade with both."""
    t = np.arange(N) / SR
    hits = snaps() + scuffs() + ticks() + clacks()
    hits = hits + gain_of(TREES_DB) * trees(hits)
    first = np.clip((CUT_S - t) / FADE_OUT_S, 0, 1)
    second = np.clip((t - CUT_S - FADE_IN_DELAY_S) / FADE_IN_S, 0, 1)
    mix = first * trail(hits) + second * puddle(hits) + (first + second) * (lows() + air())
    return mix[None]


def record(dry):
    """A small microphone drops the deepest bass; a steep low-pass then limits the band."""
    thin = signal.lfilter(*signal.butter(2, 65, "high", fs=SR), dry)
    low_pass = signal.firwin(767, EDGE_HZ, window=("kaiser", 9), fs=SR)
    return signal.oaconvolve(thin, low_pass[None], "same")


dry = scene()
out = record(dry)
dump(out)
```